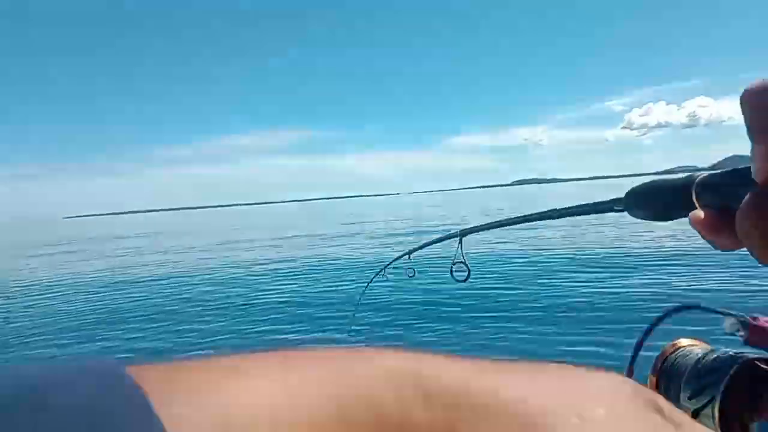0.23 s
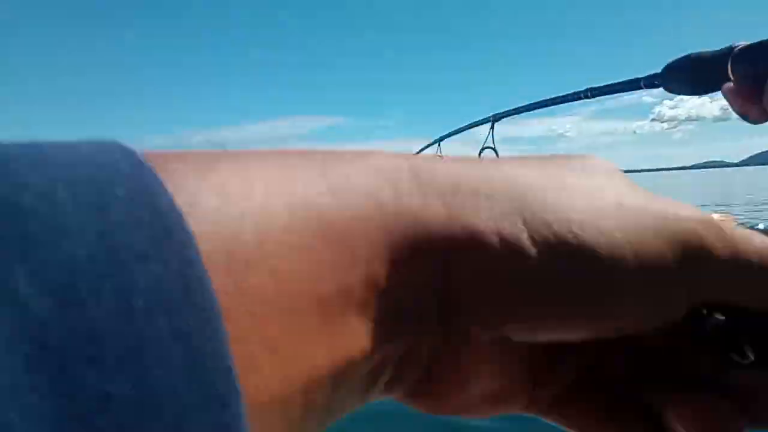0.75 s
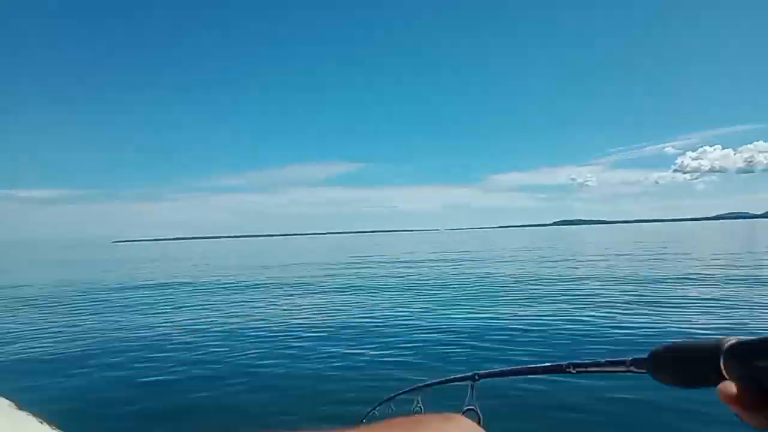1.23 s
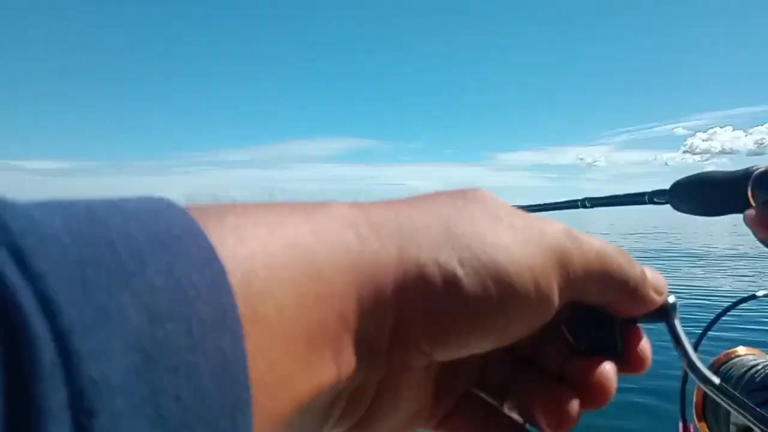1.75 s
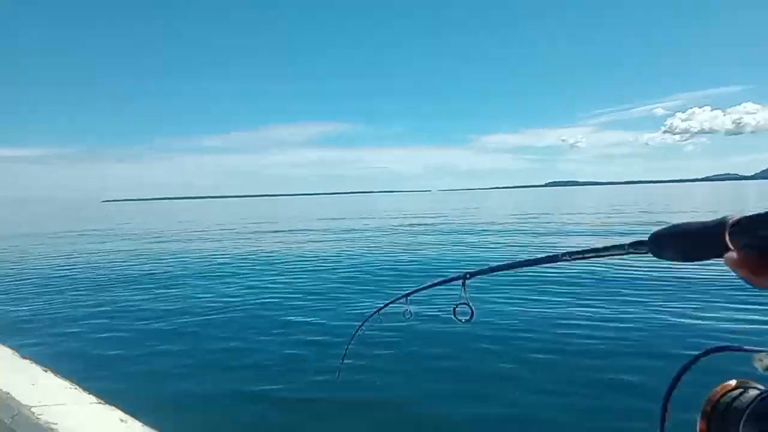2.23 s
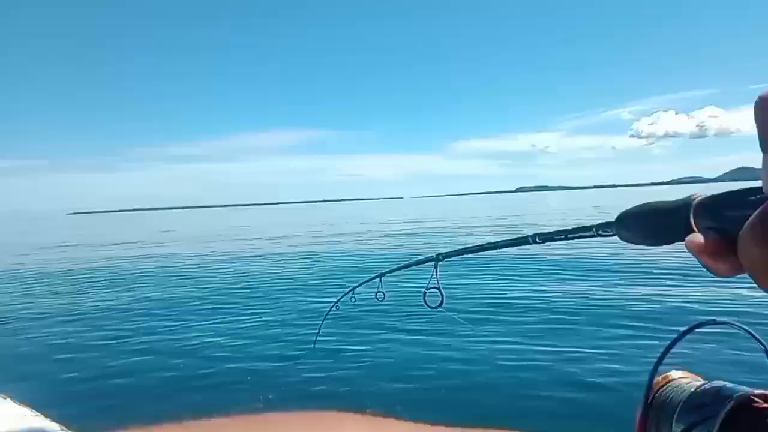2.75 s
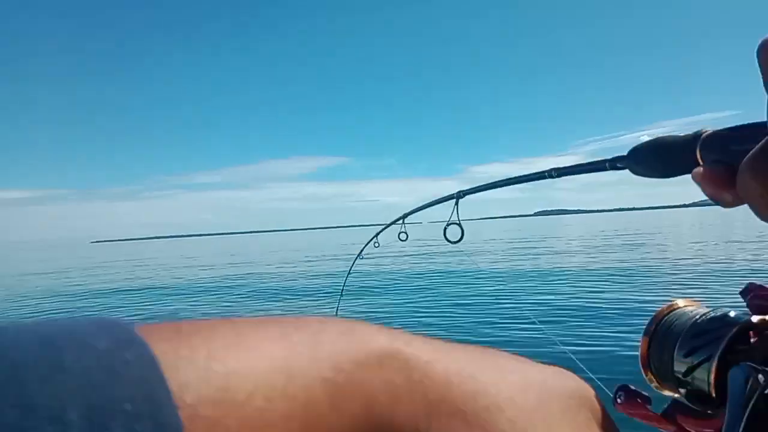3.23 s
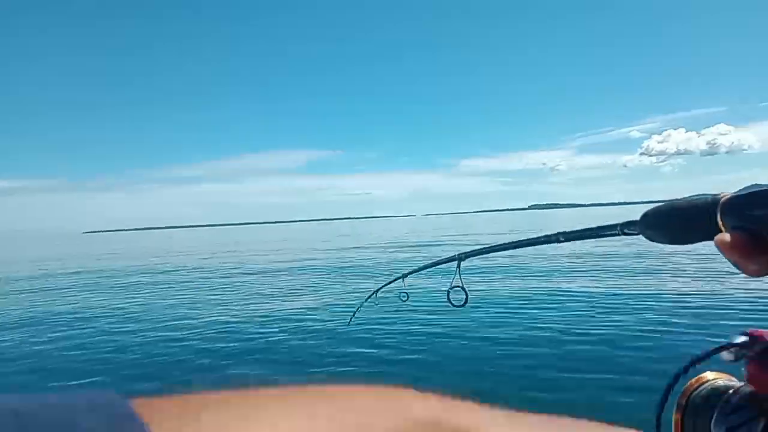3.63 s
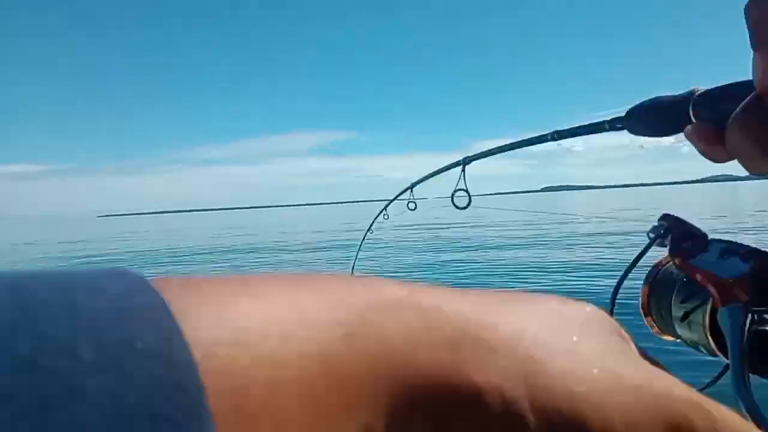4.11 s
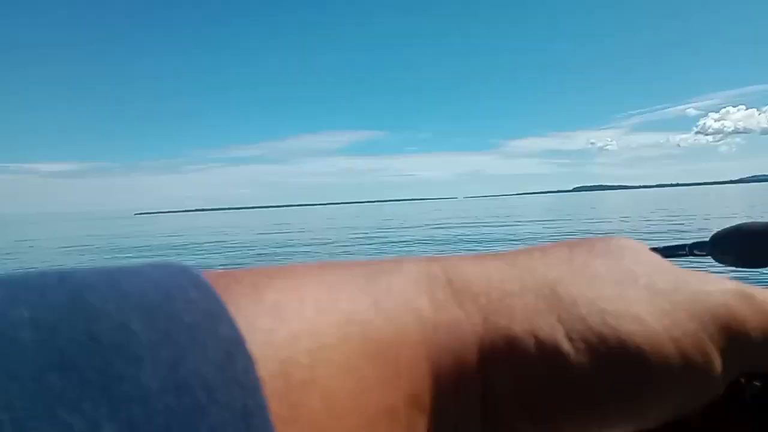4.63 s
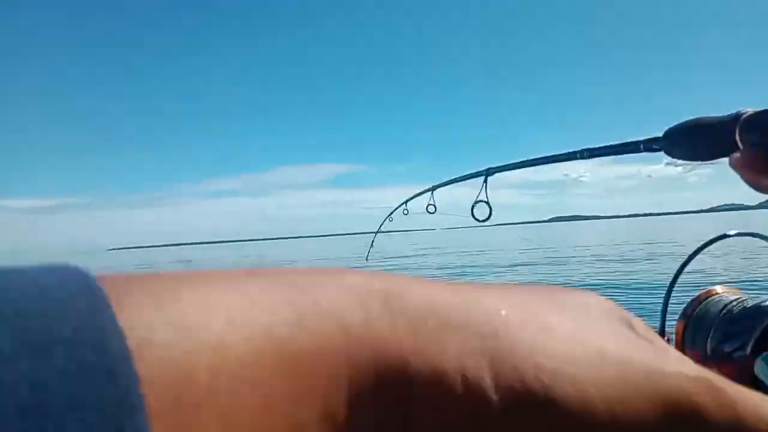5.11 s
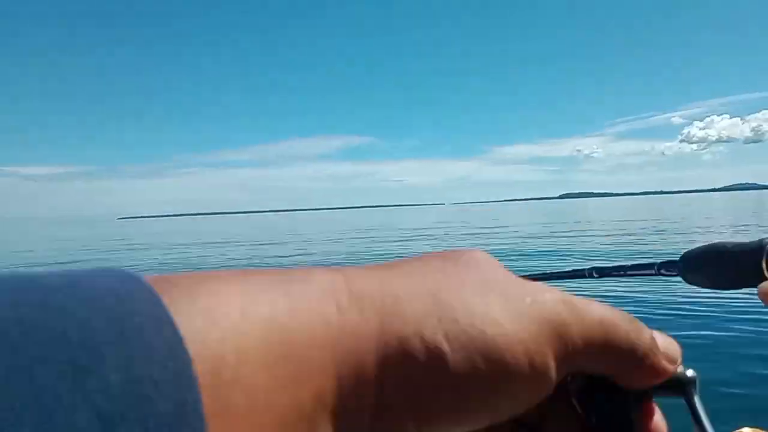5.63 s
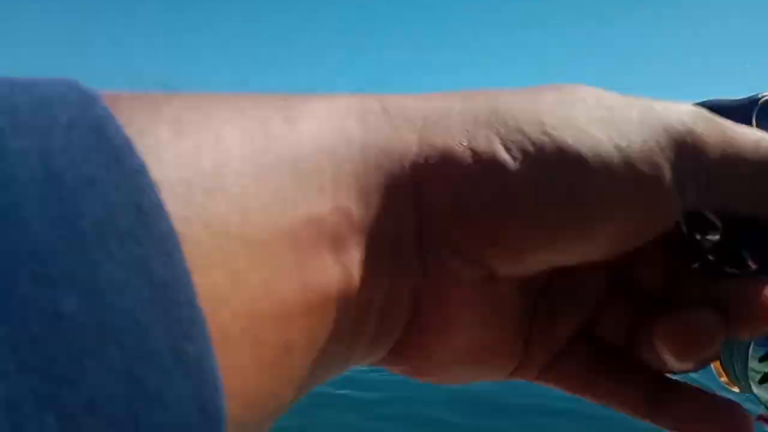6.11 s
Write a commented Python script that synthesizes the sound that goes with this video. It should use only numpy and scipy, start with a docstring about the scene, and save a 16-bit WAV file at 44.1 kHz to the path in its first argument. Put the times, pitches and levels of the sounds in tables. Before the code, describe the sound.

A fishing reel whines in eight metallic, squeaky pulls, each rising, wavering and braking, with hull knocks and a faint low rumble of wind and sea.

```python
"""Fishing reel in a small boat

Line is pulled off the reel in eight pulls: a spring clicks over the spool's teeth so fast that it whines,
wavering once a turn and ringing the metal spool. Small metal parts tick as short scratches, knocks boom and
rattle through the hull, and filtered noise makes a low rumble of wind and sea with a faint hum."""
import sys
import numpy as np
from scipy import signal
from scipy.io import wavfile
from scipy.ndimage import uniform_filter1d

SR = 44100
rng = np.random.default_rng(int(sys.argv[2]) if len(sys.argv) > 2 else 0)


def store_pcm(level_fs):
    """Save levels as 16-bit WAV."""
    pcm = np.round(np.clip(level_fs, -1, 1) * 32767).astype(np.int16)
    wavfile.write(sys.argv[1], SR, np.atleast_2d(pcm).T)


N = 280917
HZ = np.fft.rfftfreq(8192, 1 / SR)  # frequency grid of all responses

# Spectrum of splashing water. Each row: frequency in Hz, relative level in dB.
SPLASH_SPECTRUM = [(700, -43), (1500, -1.5), (3000, 0), (5000, -16.5), (9000, -18), (10500, -20.5),
                   (15000, -44)]


def amp(db):
    """Decibels to gain."""
    return 10 ** (np.asarray(db) / 20)


def evened(x):
    """Scales to rms 1."""
    return x / np.sqrt(np.mean(x ** 2) + 1e-20)


def causal(gain):
    """Minimum-phase impulse response with the given gain on the grid HZ."""
    log_gain = np.log(np.maximum(gain, 1e-6))
    circle = np.r_[log_gain, log_gain[-2:0:-1]]
    spectrum = np.exp(np.conj(signal.hilbert(circle)))
    return np.fft.ifft(spectrum).real[:4096]


def shaped(points):
    """Response of a smooth spectrum, its level interpolated over log frequency."""
    f_hz, db = np.transpose(points)
    return causal(amp(np.interp(np.log(HZ + 1), np.log(f_hz), db)))


def ringing(modes, skirt=3.11):
    """Response of a set of modes; skirt sets how fast each falls away from its peak."""
    power = 0
    for f_hz, width_hz, db in modes:
        power = power + amp(2 * db) / (1 + (2 * (HZ - f_hz) / width_hz) ** 2) ** skirt
    return causal(np.sqrt(power))


def unit_energy(response):
    """Scales a response to unit energy, so that white noise keeps its rms through it."""
    return response / np.linalg.norm(response)


def through(x, response):
    """Convolves and cuts to length."""
    return signal.oaconvolve(x, response)[:N]


def add(mix, start_s, sound):
    """Mixes a sound in at start_s."""
    part = mix[round(start_s * SR):][:len(sound)]
    part += sound[:len(part)]


def drift(position, over):
    """Random wander of rms 1 with a new value every `over` units of position."""
    return np.interp(position / over, np.arange(3000), rng.standard_normal(3000)) * np.sqrt(1.5)


def spell(t, start_s, end_s, ramp_s):
    """Gate from 0 to 1 and back with linear ramps inside the spell."""
    return np.clip(np.minimum(t - start_s, end_s - t) / ramp_s, 0, 1)


def pull(first_hz, forces, start, up, heave, ease, brake, stop,
         cruise_hz, heave_hz, slack_hz, brake_hz, stop_hz, turn):
    """Spin-up with overshoot, cruise, heave, slack and brake: time, click rate, force, treble, spool angle."""
    teeth_per_turn = 148
    overshoot, settle_s = 0.08, 0.081  # extra share of speed after spin-up, and time to lose it
    heave_rise_s, heave_sag, slacken_s = 0.045, 0.14, 0.085  # sag: share of speed lost during the heave
    slow_db, slow_hz = -21.5, 847  # force lost at rest, won back as the click rate nears slow_hz
    treble_base_db, bite, treble_db_per_khz = -46.5, 0.97, 9.5  # bite: treble dB per dB of force

    t = np.arange(max(start, 0), stop, 1 / SR)
    knots_s = np.maximum.accumulate([start, up, up + settle_s, heave, heave + heave_rise_s,
                                     ease, ease + slacken_s, brake, stop])
    hz = np.interp(t, knots_s, [first_hz, cruise_hz * (1 + overshoot), cruise_hz, cruise_hz, heave_hz,
                                heave_hz * (1 - heave_sag), slack_hz, brake_hz, stop_hz])

    kick_db, cruise_db, heave_db, ease_db, slack_db, brake_db, share_db = forces
    force_db = np.interp(t, knots_s, [kick_db, kick_db, cruise_db, cruise_db, heave_db,
                                      ease_db, slack_db, brake_db, brake_db])
    force_db = force_db + slow_db * np.clip(1 - hz / slow_hz, 0, 1)
    treble_db = treble_base_db + share_db + bite * force_db + treble_db_per_khz * hz / 1000

    turns = np.cumsum(hz) / SR / teeth_per_turn
    angle_turns = turn + turns - np.interp(heave, t, turns)
    return t, hz, force_db, treble_db, angle_turns


def clicker(t, hz, force_db, treble_db, angle_turns):
    """One click a tooth, as overtones of the click rate; the spring slips, so timing and force waver."""
    # Spells in which the spring bounces and every second click is weaker.
    # Each row: start in s, end in s, alternation depth in dB (adds to the depth at rest).
    bounces = [(0.293, 0.455, -6.5), (1.05, 1.288, -13.5), (1.714, 1.834, -1.5), (1.95, 2.204, -11),
               (3.67, 3.907, -6), (4.055, 4.42, -27), (4.615, 4.837, -7)]
    # Squeaks, when the spring digs in for a moment. Each row: start in s, length in s, extra force in dB.
    squeaks = [(.0, 0.081, 0.5), (0.252, 0.074, 3.5), (0.374, 0.011, 4.5), (0.46, 0.035, 12),
               (0.576, 0.029, 6.5), (0.768, 0.011, 4), (0.815, 0.011, 9.5), (0.825, 0.014, 12),
               (0.862, 0.012, 11), (1.04, 0.011, 2), (1.307, 0.018, 8), (1.406, 0.03, 4),
               (1.683, 0.044, 14), (1.827, 0.01, 12.5), (1.881, 0.023, 12.5), (2.018, 0.021, 8),
               (2.269, 0.0092, 4.5), (2.284, 0.026, 7.5), (2.503, .012, 6.5), (2.796, 0.028, 10.5),
               (2.957, 0.02, 4), (3.015, 0.0075, 6), (3.651, 0.028, 0), (3.705, 0.023, 1.5),
               (3.772, 0.014, 6.5), (4.154, 0.007, 9), (4.314, 0.037, 12), (4.604, 0.059, 4),
               (5.168, 0.035, 6), (5.218, 0.023, 6), (5.352, .03, 8.5), (5.542, 0.023, 1.5),
               (5.625, 0.026, 4), (5.676, 0.016, 5), (6.098, 0.01, 11)]
    wobble = 0.1  # share by which the off-centre spool speeds up and slows in each turn
    tilt = 1.45  # overtone n of the push falls as n ** -tilt
    rest_db, patchy_db, grit = -17.0, 2.0, 0.53  # alternation at rest; wander of each contact overtone, of all

    rate_hz = hz * (1 + wobble * np.cos(2 * np.pi * angle_turns))
    teeth = np.cumsum(rate_hz) / SR
    place = teeth + .145 * drift(teeth, 6) + .05 * drift(teeth, 1.5)

    strength = 1 + .27 * drift(teeth, 3)
    strength = strength * amp(3.6 * np.minimum(drift(teeth, 22), .4))
    bounce = amp(rest_db) + sum(amp(db) * spell(t, start, end, 0.027) for start, end, db in bounces)
    strength = strength * (1 + bounce * np.cos(np.pi * place))
    strength = strength * signal.windows.tukey(len(t), .02)
    dig_db = sum(db * spell(t, start, start + length, 0.0013) for start, length, db in squeaks)

    orders = np.arange(1, 21)[:, None]
    fade = np.clip(6 - orders * rate_hz / 2500, 0, 1)  # gone above 15 kHz
    tones = np.cos(2 * np.pi * orders * place) * fade

    # the push on the spool is blunt, so its overtones fall away
    push = (tones / orders ** tilt).sum(0)
    # the sharp contact does not tilt them, but its shape keeps changing
    contact = sum(tone * amp(patchy_db * drift(teeth, 61.14)) for tone in tones[1:])
    contact = contact * (1 + grit * drift(teeth, 1.6))
    return push * strength * amp(force_db + dig_db), contact * strength * amp(treble_db)


def reel():
    """The clicks ring the spool and reel body; harder contact brings out the high modes."""
    # Each row: start, up to speed, heave begins, heave ends, brake, stop, all in s; click rate in Hz at
    # cruise, heave, slack, brake, stop; spool angle in turns as the heave begins.
    pull_plan = [(-0.095, 0.038, 0.18, 0.407, 0.578, 0.672, 2030.0, 2900.0, 1750.0, 1870.0, 60.0, 0.48),
                 (0.699, 0.875, 1.027, 1.259, 1.407, 1.497, 2080.0, 2700.0, 1700.0, 1880.0, 60.0, 0.86),
                 (1.581, 1.708, 1.902, 2.142, 2.305, 2.392, 2200.0, 2710.0, 1430.0, 1890.0, 60.0, 0.47),
                 (2.434, 2.558, 2.751, 2.86, 3.107, 3.262, 1940.0, 2790.0, 1640.0, 1820.0, 60.0, 0.87),
                 (3.269, 3.41, 3.622, 3.861, 4.05, 4.12, 2120.0, 2450.0, 1340.0, 1300.0, 650.0, 0.47),
                 (4.12, 4.374, 4.501, 4.796, 4.964, 5.08, 1900.0, 2480.0, 1540.0, 1700.0, 60.0, 0.35),
                 (5.085, 5.264, 5.473, 5.665, 5.861, 5.944, 2130.0, 2450.0, 1570.0, 1700.0, 60.0, 0.38),
                 (6.018, 6.13, 6.24, 6.29, 6.367, 6.472, 2130.0, 2070.0, 2060.0, 2070.0, 60.0, 0.86)]
    # Each row, one a pull: click force in dB at spin-up, cruise, heave begins, heave ends, slack, brake;
    # extra treble in dB.
    pull_forces = [(-7, -15.5, -9.5, -10, -18, -10.5, 2), (-10, -14, -12, -10, -19, -12, 1.5),
                   (-13.5, -19, -9, -14, -27, -14, 3.5), (-19.5, -25, -18.5, -18.5, -27, -13, 2.5),
                   (-12, -12.5, -5.5, -12.5, -28.5, -13.5, 0.4), (-12.5, -17.5, -9.5, -11.5, -25, -13, 2.3),
                   (-10, -13.5, -7, -8.5, -16.5, -8, 0), (-17, -17.5, -15.5, -17.5, -24.5, -27, 1)]
    # Low modes, then high modes. Each row: frequency in Hz, width in Hz, relative level in dB.
    low_modes = [(524, 59, -12), (968, 91, -12), (1184, 78, -15.5), (1383, 103, -12), (1466, 45, -11),
                 (1751, 142, -9.5), (1913, 129, -3), (2145, 190, -14.5), (2419.6, 83, -2.5), (2637, 53, -9),
                 (2780, 315, -12.5), (3049, 130, -14.5)]
    high_modes = [(3465, 45, -2), (3883, 135, 2.5), (4138, 110, -1), (4760, 220, -12), (5117, 71, -3),
                  (5404, 123, -8), (5974, 150, -6), (6350, 84, -6.5), (6720, 42, -2), (7296, 260, -9.5),
                  (8070, 220, -9.5), (8680, 290, -9.5), (9420, 130, -17), (10130, 460, -23),
                  (11260, 810, -22), (13200, 2100, -34.5)]

    low, high = np.zeros((2, N))
    previous_rows = pull_plan[:1] + pull_plan
    for row, previous, forces in zip(pull_plan, previous_rows, pull_forces):
        t, *motion = pull(previous[-2], forces, *row)  # starts at the previous stop's click rate
        force, treble = clicker(t, *motion)
        add(low, t[0], force)
        add(high, t[0], treble)

    body = through(low, ringing(low_modes, skirt=1.7))
    t = np.arange(N) / SR
    shine = 0
    for k in range(5):  # as the grip shifts, the high modes swell and fade in sets
        swell = amp(4.5 * drift(t, 0.07) - 1.5)
        shine = shine + through(high * swell, ringing(high_modes[k::5], skirt=1.35))
    return body + shine


def rumble():
    """Low lumpy noise that swells with small gusts, over a hum of noise bands and a faint hiss of water."""
    # Wind spectrum. Each row: frequency in Hz, relative level in dB per Hz.
    wind_spectrum = [(18, -72.5), (30, -14.5), (146, -0.5), (220, -14), (350, -7.5), (438, -15),
                     (548, -16.5), (1510, -15.5), (2010, -14), (3850, -40.5), (5000, -106), (8470, -120)]
    # Faint steady hum. Each row: frequency in Hz, width in Hz, rms level in dB.
    hum_bands = [(102, 38, -61), (255, 7, -64), (308.3, 33, -64.5)]

    gusts = uniform_filter1d(rng.standard_normal(N), 2500)
    gusts = evened(uniform_filter1d(gusts, 2500))
    swell_db = 3 * gusts
    wind = amp(-51 + swell_db) * evened(through(rng.standard_normal(N), shaped(wind_spectrum)))

    hum = 0
    for f_hz, width_hz, db in hum_bands:
        band = through(rng.standard_normal(N), ringing([(f_hz, width_hz, 0)], skirt=2.14))
        hum = hum + amp(db) * evened(band)

    sea = amp(-65) * evened(through(rng.standard_normal(N), shaped(SPLASH_SPECTRUM)))
    return wind + hum + sea


def ticks():
    """Short noise scratches ring thin metal; faint ones come at random."""
    # Each row: start in s, scratch level in dB.
    loud = [(0.3292, -45), (0.4519, -41), (1.524, -34.5), (1.5263, -33), (1.7358, -22), (1.763, -29),
            (2.6194, -36), (3.4092, -34), (4.14, -75), (4.9327, -38), (5.2954, -34), (5.3727, -27),
            (6.2325, -46), (6.2485, -42)]
    # Modes of the metal parts. Each row: frequency in Hz, width in Hz, relative level in dB.
    metal_modes = [(3950, 2700, -7), (8860, 440, -0.5), (10720, 81, 10), (11660, 90, 4), (13700, 310, -3)]
    t60_s = 0.011

    x, t = np.zeros(N), np.arange(600) / SR
    faint = rng.uniform([0, -64.0], [N / SR, -50.0], size=(80, 2))
    for start_s, db in [*loud, *faint]:
        add(x, start_s, amp(db - 60 * t / t60_s) * rng.standard_normal(len(t)))
    return through(x, unit_energy(ringing(metal_modes, skirt=1.2)))


def knocks():
    """Each knock is a thump and a rattling burst that boom in the hull and die away, with a wet hiss above."""
    # Each row: time in s, then drive levels in dB of hull rattle, deep boom and splashy treble; t60 in s.
    blows = [(1.536, -33.5, -42, -38, 0.26), (1.737, -31, -56, -25, 0.081),
             (2.768, -21, -16.5, -26.5, 0.16), (2.953, -32.5, -34.5, -29, 0.32),
             (3.052, -30.5, -25.5, -42, 0.4), (3.168, -34, -62, -50, 0.33), (3.417, -39, -37.5, -39, 0.39),
             (4.701, -34.5, -52, -51, 0.25), (4.752, -33.5, -54, -43, 0.18), (4.882, -29, -46.5, -40, 0.28),
             (4.916, -26, -66, -42, 0.44), (5.014, -14, -41, -66, 0.21), (5.191, -23.5, -42, -43.5, 0.2),
             (5.305, -31, -48, -48, 0.51), (5.348, -27.5, -46, -39, 0.22), (5.396, -20, -39, -43, 0.16),
             (5.492, -19.5, -40.5, -30, 0.17)]
    # Hull modes, upper then deep. Each row: frequency in Hz, width in Hz, relative level in dB.
    hull_modes = [(343, 113, -10.5), (524, 250, -6.5), (727, 160, -9), (881, 96, -7.5), (1058, 350, -14.5),
                  (1486, 140, -11)]
    deep_modes = [(164, 62, -3), (237, 30, 6), (302, 73, -9.5)]

    t = np.arange(SR // 2) / SR
    hull, deep, splash = np.zeros((3, N))
    for time_s, hull_db, deep_db, splash_db, t60_s in blows:
        start_s = time_s - .004  # the attack leads the listed time
        shape = np.minimum(t / 0.0046, 1) * amp(-60 * t / t60_s)
        rattle = rng.standard_normal(len(t)) * amp(2 * np.minimum(drift(t, .004), 1))
        add(hull, start_s, amp(hull_db) * shape * rattle)
        add(deep, start_s, amp(deep_db - 2.5) * shape * rattle)
        add(deep, start_s, amp(deep_db) * signal.windows.hann(50))  # the thump

        hiss = amp(splash_db + 0.5 + 3.6 * drift(t, 0.0029)) * rng.standard_normal(len(t))
        add(splash, start_s, hiss * shape * np.minimum(t / 0.022, 1))

    boom = through(hull, unit_energy(ringing(hull_modes)))
    boom = boom + through(deep, unit_energy(ringing(deep_modes, skirt=1.68)))
    return boom + through(splash, unit_energy(shaped(SPLASH_SPECTRUM)))


def boat(x, wet_db=-17.5, t60_s=0.095):
    """The open hull throws back a short, dull scatter of echoes."""
    t = np.arange(SR // 4) / SR
    tail = signal.lfilter([1], [1, -.6], rng.standard_normal(len(t)))
    tail = tail * amp(-60 * t / t60_s) * (t > .003)
    return x + amp(wet_db) * through(x, unit_energy(tail))


def scene():
    """Reel and ticks with the boat's echoes, plus knocks and rumble without."""
    return (boat(reel() + ticks()) + knocks() + rumble())[None]


def record(dry):
    """A small microphone with weak lowest bass and top and a faint hiss, then a band limit."""
    # Microphone response. Each row: frequency in Hz, gain in dB.
    mic_response = [(20, -16.5), (70, 4.5), (120, 3), (9400, -1.5), (10000, -9.5), (12000, -14.5),
                    (15000, -18.5)]
    edge_hz = 15700
    heard = through(dry[0], shaped(mic_response))[None]
    heard = heard + amp(-94.5) * rng.standard_normal(N)
    lowpass = signal.firwin(511, edge_hz, window=("kaiser", 9), fs=SR)
    return signal.oaconvolve(heard, lowpass[None], "same")


dry = scene()
out = record(dry)
store_pcm(out)
```